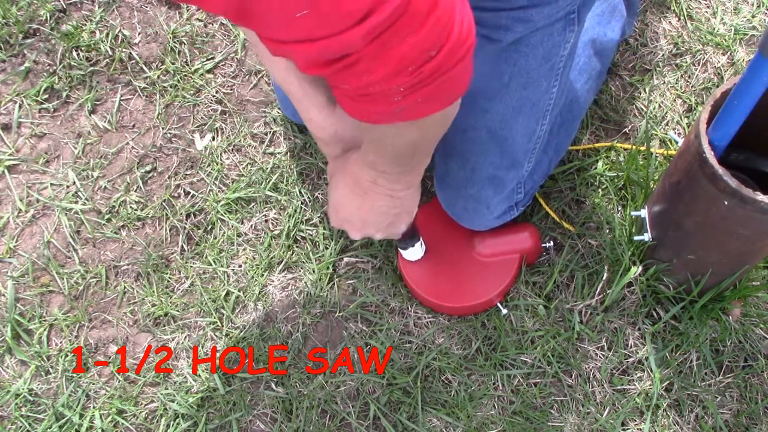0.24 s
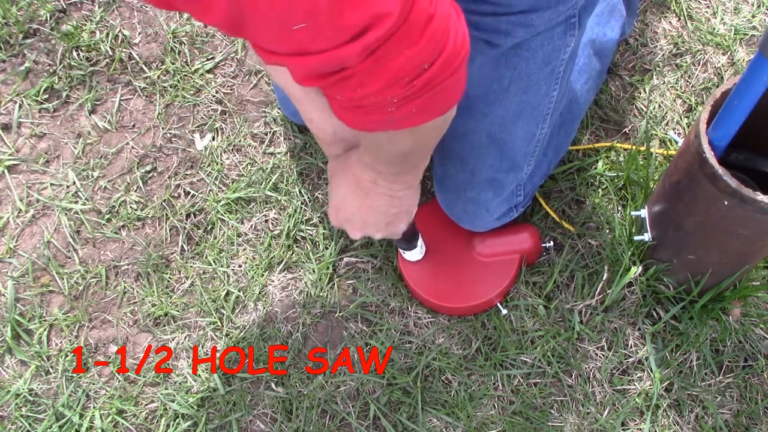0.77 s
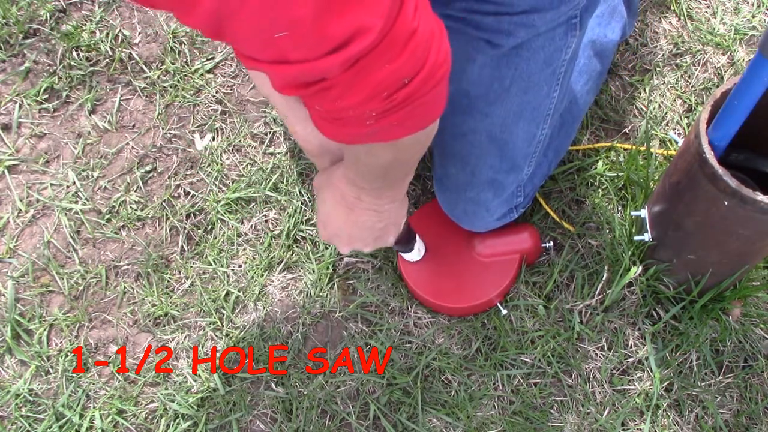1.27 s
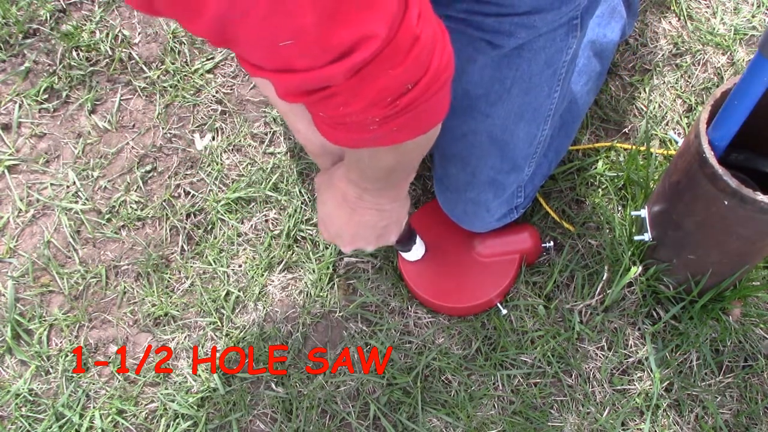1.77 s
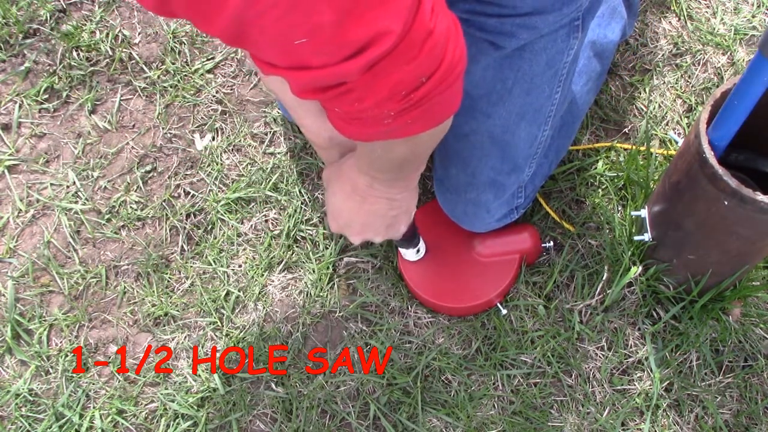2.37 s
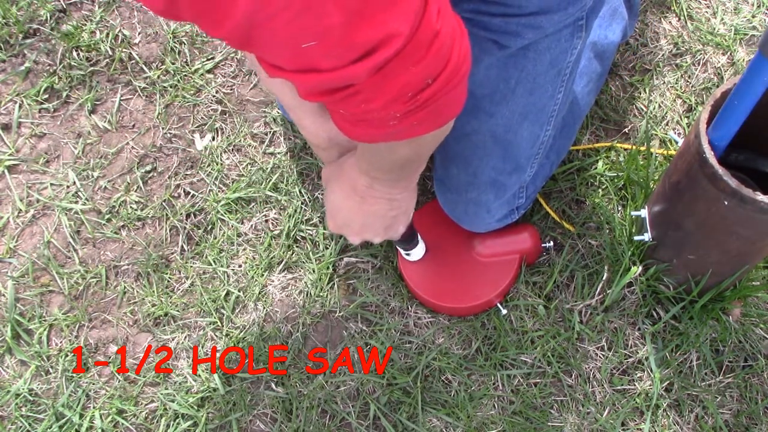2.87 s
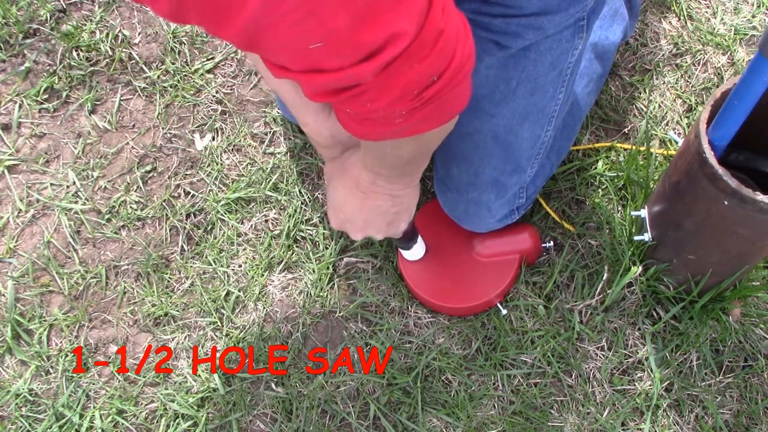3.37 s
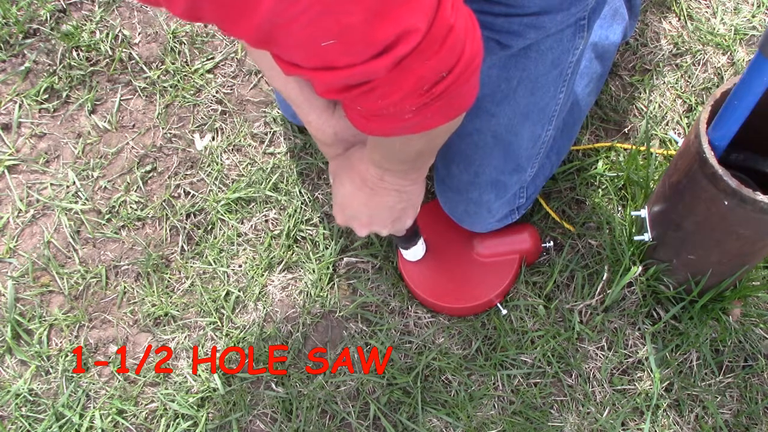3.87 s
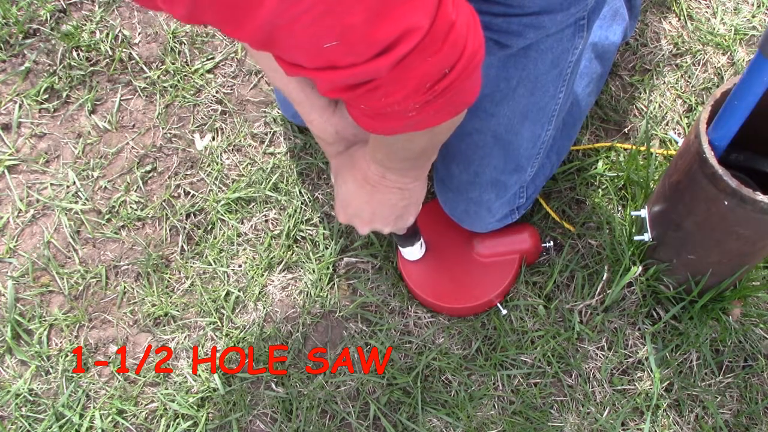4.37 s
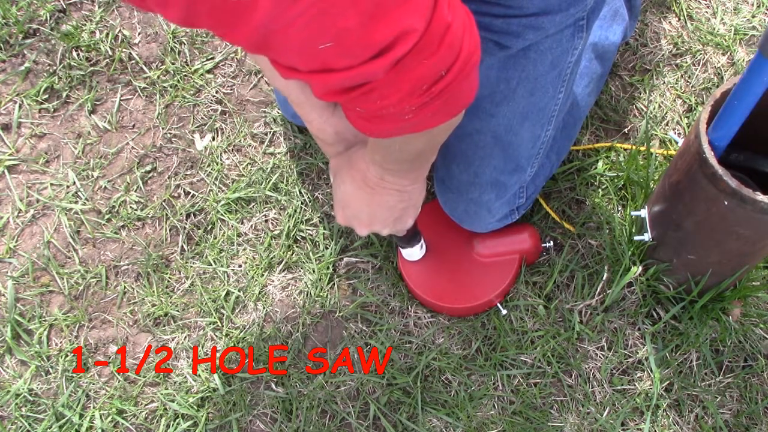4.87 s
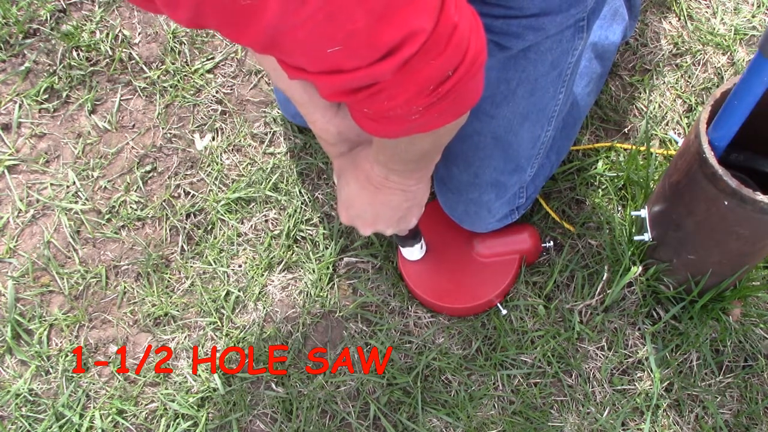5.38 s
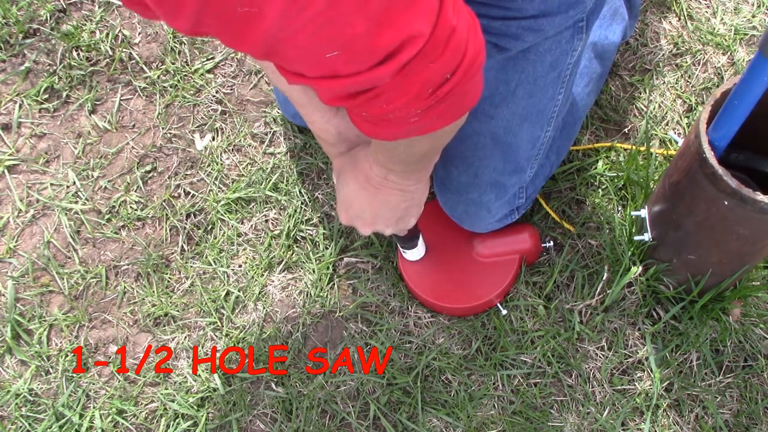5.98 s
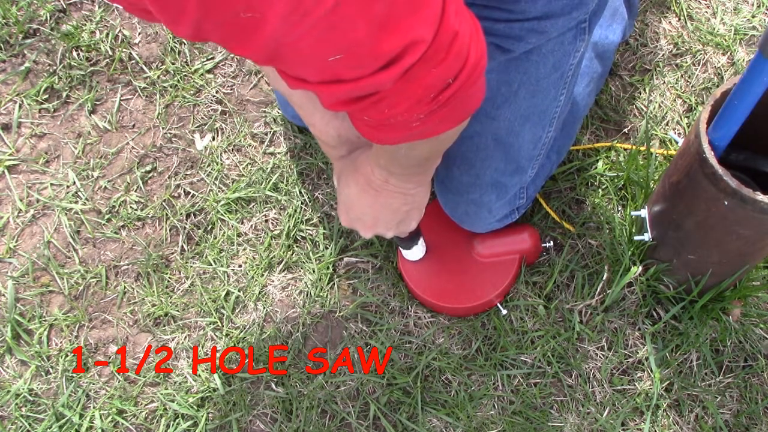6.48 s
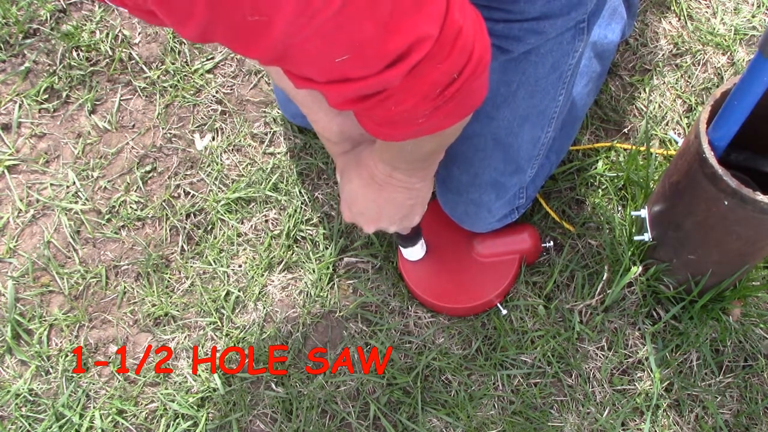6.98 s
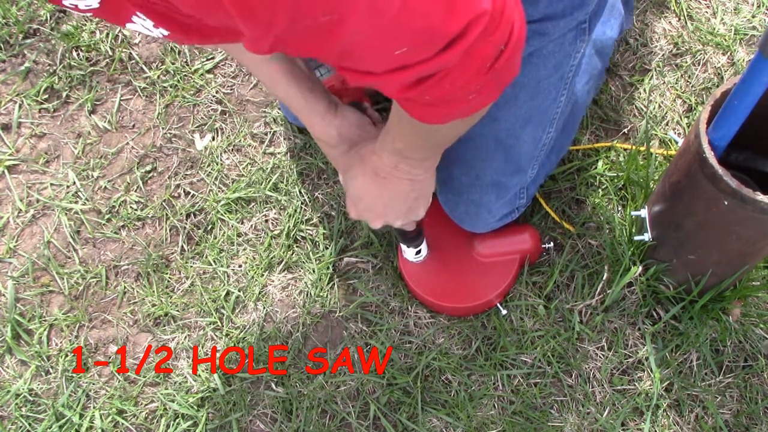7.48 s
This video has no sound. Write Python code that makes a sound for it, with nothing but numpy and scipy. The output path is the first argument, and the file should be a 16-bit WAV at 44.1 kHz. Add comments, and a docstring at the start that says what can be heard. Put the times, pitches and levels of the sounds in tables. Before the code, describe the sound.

Quiet lawn air with a faint low rumble, then a bright metallic knock as a hole saw meets an iron lid. The cordless drill stutters and nearly stalls, then climbs in steps to a steady buzzing whine over gritty scraping. Late on it slips free, races up and squeaks, stops briefly, bursts again and jams with clunks. Close, dry outdoor pickup.

```python
"""Hole saw in a cast-iron lid

A cordless drill cuts into a lid on a lawn: rumble and air behind, motor and saw in front.
Motor: sines on multiples of the turning field, plus switching whistles whose sidebands spread with speed.
Saw: noise chips through resonances of lid, teeth and cup; short grabs, knocks, squeaks and a ground jolt.
The speed moves in steps; the saw slips free twice, jams and stops."""
import sys
import numpy as np
from scipy import signal
from scipy.fft import rfft, irfft
from scipy.io import wavfile
from scipy.ndimage import uniform_filter1d

SR = 44100
rng = np.random.default_rng(int(sys.argv[2]) if len(sys.argv) > 2 else 0)


def materialize(psi):
    """Save the field psi as 16-bit PCM at rate SR to the path in sys.argv[1].

    A 1-D psi becomes a single channel; in a 2-D psi each row is a channel.
    """
    bounded = np.clip(np.atleast_2d(psi).T, -1, 1)
    quanta = np.round(bounded * 32767).astype(np.int16)
    wavfile.write(sys.argv[1], SR, quanta)


N = 341334

# lawn noise spectrum: [f/Hz, relative level/dB]
LAWN_SPECTRUM = [(15, -40), (25, -22), (48, -12), (61, -5.5), (156, -5), (178, -9), (331, -21), (598, -14),
                 (1710, -25), (4500, -37.5), (12500, -43), (13900, -45), (15500, -40)]
LAWN_RMS_DB = -44

# trigger and hand moves: [t/s, field speed headed for/Hz, lag/s, drive/dB, switching/dB, tooth bite/dB]
TRIGGER_MOVES = [(.449, 212.5, 0.025, -0.5, -37.5, -1), (.606, 132, 0.028, 2.5, -39.5, -3),
                 (0.9001, 379.5, 0.032, -1, -35.5, 2.5), (1.0863, -112, 0.07, -4.5, -42.5, -1),
                 (1.2966, 160.5, .025, -6, -37.5, -0.5), (1.4197, 385, 0.019, 0.5, -38.5, 0.5),
                 (2.02, 707, 0.069, 1, -33.5, -0.5), (2.1068, 540, 0.06, -1.5, -34, -2),
                 (2.3, 528, 0.27, -1, -34.5, -1.5), (3.4118, 718, 0.056, -1.5, -33, 1),
                 (3.56, 688, 0.051, 1.1, -37, 2), (3.8, 678, .25, 0, -36, -1.5),
                 (4.19, 673.5, .25, -1.1, -37, -0.5), (6.11, 720, .035, 1.5, -38, 0),
                 (6.175, 1850, 0.051, 2, -49, 1.5), (6.258, 1329.5, 0.038, -2.5, -47, -1),
                 (6.325, 850, 0.033, -8.5, -47, -2), (6.403, 342.5, .012, 4.5, -50, -2),
                 (6.424, 340, 0.016, -24, -42, -10), (6.4874, 585.5, 0.039, 0.5, -37.5, 0.5),
                 (6.812, 1420, 0.022, 2, -46, 0.5), (6.935, 1158, .022, -1.5, -48, 0.5),
                 (7.08, 1100, 0.063, 0.5, -50.5, 1.5)]
INITIAL_FIELD_HZ, MIN_FIELD_HZ = 197, 5
LEVEL_SMOOTHING_S = .015
# short level dips: [t/s, motor depth/dB, saw depth/dB, Gaussian half-width at 1/e/s]
LEVEL_DIPS = [(4.18, -14, -5, .005), (5.14, -8, 0, .006), (6.185, -16, -8, .004), (7.078, -14, -10, .005)]

MOTOR_ON_S, MOTOR_OFF_S = 0.4565, 7.2
# trigger let go between the cuts: (start t/s, end t/s)
TRIGGER_PAUSE_S = (6.45, 6.527)
POLE_PAIRS = 7
# strong multiples of the field speed
FIELD_MULTIPLES = (1, 2, 3, 4, 5, 7)
# their levels, swelling at housing resonances: [field speed/Hz, one level/dB per strong multiple]
FIELD_LEVELS = [(134, -60, -65, -46.5, -64, -66, -56), (174, -63, -66, -66, -62, -51, -38),
                (215, -62, -66, -49, -41, -32, -44), (289, -52, -58, -39, -49, -33, -51),
                (362.6, -43, -64, -28.5, -50, -52, -27), (388, -59, -42.5, -34.5, -55, -42, -29),
                (482, -36, -29, -36, -53, -38, -28), (527.4, -42, -23, -35, -32, -34, -32),
                (586, -48, -20.5, -31.5, -26.5, -18.5, -39), (600, -40, -20.5, -27, -20, -15, -40),
                (643.2, -30, -23.5, -36, -7.5, -17, -31), (680.3, -40, -28.5, -41, -9, -27, -50),
                (704, -34, -41, -46, -7.5, -42, -50), (785.4, -24.5, -45, -34, -12.5, -37, -45),
                (920, -21.5, -48, -14, -24, -43, -47), (1100, -14.5, -38, -40, -23, -46, -48),
                (1145.6, -17.5, -39, -39, -21.5, -40, -53), (1230, -21, -42, -42, -21.5, -32, -56),
                (1285.5, -25, -40, -43, -23, -40, -55), (1345, -36, -32, -46, -49, -41, -56)]
# weaker lines, unbalance, gear mesh, high multiples: [multiple of shaft speed, level/dB, waver/dB]
SHAFT_LINES = [(3, -1, 2), (4, 4, 2), (5, 2, 2), (6, 4, 2), (12.24, -10, 4), (13.56, -6, 2), (19.35, -4, 4),
               (20.07, -3, 4), (21.52, 0, 3), (22.76, -6, 2), (31.7, -7, 3), (42, -6, 2), (56, -1.5, 4)]
SHAFT_LINES_DB, SHAFT_FULL_FIELD_HZ = -38, 480
# housing radiation of the weaker lines: [f/Hz, gain/dB]
HOUSING_GAIN = [(300, -10), (600, -8), (720, -2.5), (900, -12.5), (1150, 8), (1600, 1.5), (2200, 6.5),
                (2800, -2), (3200, 15.5), (3600, -1), (4100, -8), (5500, -13), (8000, -4), (11000, -30)]
SIXTH_FROM_HZ, SIXTH_FADE_HZ, SIXTH_DB = 1190, 90, -28.5
SWITCH_HZ = 7806
# switching whistles: [multiple of switching rate, multiple of field added, level/dB]
SWITCH_SIDEBANDS = [(1, 0, -7.5), (1, -1, 3), (1, 1, -2), (1, -2, -17), (1, 2, -10), (2, -1, -24),
                    (2, -2, -22)]
# housing radiation of the whistles: [f/Hz, gain/dB]
WHISTLE_GAIN = [(6400, -4), (7000, 8.5), (7130, 2), (7270, -10.5), (7420, -0.5), (7600, -0.5), (8000, -9.5),
                (8190, -0.5), (8340, 5), (8480, -2), (8900, 0), (9200, -24), (14300, -1), (15500, 4)]

STRIKE_S, LIFT_S, CUT_END_S = .479, 6.432, 7.2  # cup hits the iron, teeth leave it, last cut ends
JAM_S, JAM_FADE_S = 7.21, 0.0089  # saw tight in the hole: cup damped, lid dragged
# steady cut against speed: [field speed/Hz, scrape/dB, then below scrape: lid/dB, hiss/dB, top/dB]
CUT_LEVELS = [(8.03, -46, -2, -7.5, -24), (75, -38.5, 2, -8, -35), (131, -31.5, -0.5, -10, -23.5),
              (212, -29, -4, -9.5, -25), (384, -24.5, -4.5, -8, -22), (495, -21.5, -3, -5, -21),
              (704, -20, -5.5, -6, -19), (900, -19.5, -5.5, -4.5, -18.5), (1140, -16.5, -2.5, -3.5, -16),
              (1370, -15.5, -1, -3.5, -16)]
# grabs of the teeth: [t/s, scrape/dB, attack/s, hold/s, t60/s, below scrape: lid/dB, hiss/dB]
TOOTH_GRABS = [(0.46, -24.5, .001, 0.016, .08, -16, -20), (.478, -22, 0.0025, 0.0033, 0.028, -13, -5),
               (1.318, -28, 0.0036, .012, 0.2, -8.5, -17), (1.425, -23.5, 0.013, 0.01, 0.23, -10, -14),
               (6.187, -15, .005, .008, 0.097, -16, -14), (6.405, -18.5, .006, .018, 0.069, -2.5, -7.5),
               (6.432, -33, 0.0031, 0.0097, 0.14, -3, -9), (6.524, -12.5, 0.0011, 0.025, .2, -20, -17),
               (6.82, -15, 0.0063, .01, .12, -14, -18), (7.18, -13.5, .01, 0.026, 0.17, 1, -6),
               (7.222, -12, 0.0039, 0.011, 0.087, -1.5, -11.5),
               (7.27, -37.5, 0.0061, 0.034, 0.16, 4.5, -12), (7.345, -33, .003, .01, .05, 0, -11),
               (7.353, -13.5, 0.017, 0.037, .035, 0.5, -15), (7.41, -36, 0.0055, 0.014, .28, 4, -8.5)]
GRAB_TOP_BELOW_HISS_DB = -11
# lid rumble resonances: [f/Hz, width/Hz, level/dB]
LID_MODES = [(337, 168, 1), (474.6, 92, -1.5), (684, 346, 1.5), (1097, 136, -2.5), (1240, 172, 6),
             (1654, 610, 0.5), (1955, 533, 8.5)]
# scrape resonances while the saw turns freely in its cut: [f/Hz, width/Hz, level/dB]
TEETH_MODES = [(2663, 1220, -4.5), (3012, 458, 1), (3256, 146, -5), (3560, 570, -4.5)]
# scrape resonances of the dragged lid after the jam: [f/Hz, width/Hz, level/dB]
DRAG_MODES = [(2244, 110, -1), (2540, 205, 1), (2800, 600, 0), (3590, 480, -2)]
# hiss resonances: [f/Hz, width/Hz, level/dB]
HISS_MODES = [(4365, 720, -0.5), (5510, 1400, -2.5), (6270, 1040, 0.5), (7830, 1250, -5.5)]
# top resonances: [f/Hz, width/Hz, level/dB]
TOP_MODES = [(9020, 530, 0.5), (10450, 1600, 8), (10940, 800, 8), (12560, 900, 7.5)]
# cancelling lid modes: [f/Hz, width/Hz, share taken out/0-1]
LID_NODES = [(4050, 260, 0.35)]
# saw-cup modes: [f/Hz, level re scrape drive/dB, struck level/dB, t60/s]
CUP_MODES = [(2817, -9.5, -4, .35), (10720, -34, -13, .1), (12400, -44, -26, .07), (11700, -44, -30, .1),
             (5900, -44, -20, .02), (4250, -44, -22, .02)]

# knocks on the iron: [t/s, crack gain/dB, thud f/Hz, thud level/dB, crack t60/s]
IRON_KNOCKS = [(0.461, -22, 527, -38, 0.024), (0.467, -24, 437, -28, 0.028), (0.478, 7.5, 453, -25, 0.019),
               (1.319, -28, 353, -46, 0.03), (6.407, -6, 834, -10.5, 0.03), (6.42, -12, 475, -37, 0.021),
               (6.526, 2.5, 388, -38, 0.024), (7.204, 2, 342, -4, 0.045), (7.227, 5.5, 390, -11, 0.026),
               (7.306, -10.5, 1130, -22, 0.03), (7.365, -1, 417, -16, 0.019), (7.449, -20, 417, -44, 0.03),
               (7.497, -28, 330, -25, 0.02), (7.56, -29, 271, -26.5, 0.019),
               (7.689, -29, 492, -55.5, 0.051)]
CRACK_RMS, THUD_T60_RATIO = 0.16, 1.74  # noise rms at 0 dB crack gain; thud t60 re crack t60
# squeaks of the free cup: [t/s, level/dB, f/Hz, t60/s]
CUP_SQUEAKS = [(6.2492, -17, 13100, 0.05), (6.2891, -5.5, 13200, 0.036), (6.3245, -16, 13100, 0.06),
               (6.3674, -15, 13200, 0.05), (6.8768, -10, 13100, 0.05), (6.9047, -9.5, 13190, 0.055),
               (6.9448, -15, 13100, 0.053)]
# ground shaking: [t/s, level/dB]
GROUND_JOLT = [(7.17, -70), (7.21, -32), (7.27, -36), (7.33, -34), (7.43, -42), (7.5, -70)]

LOWPASS_HZ = 15600


def undb(db):
    """Gain of a level in dB."""
    return 10 ** (np.asarray(db) / 20)


def unit(x):
    """Scale to rms 1."""
    return x / np.sqrt(np.mean(x ** 2))


def decay(t, t60):
    """Exponential decay, 60 dB in t60."""
    return np.exp(-np.log(1000) * t / t60)


def response(table, hz):
    """Gain at hz, interpolated in dB over log frequency."""
    f, db = np.transpose(table)
    return undb(np.interp(np.log(hz + 1), np.log(f), db))


def by_speed(table, hz):
    """Table columns interpolated at field speed hz."""
    speed, *columns = np.transpose(table)
    return [np.interp(hz, speed, column) for column in columns]


def band(x, hz, width):
    """One resonance, gain 1 at the centre."""
    return signal.lfilter(*signal.iirpeak(hz, hz / width, SR), x)


def body(x, modes):
    """Parallel two-stage resonances of alternating sign, rms 1 in total."""
    out = 0
    for k, (f, width, db) in enumerate(modes):
        mode = unit(band(band(x, f, width), f, 2 * width))
        out = out + (-1) ** k * undb(db) * mode
    return unit(out)


def walk(rate_hz):
    """Random levels held 1 / rate_hz and slewed twice, rms 1."""
    k = int(SR / rate_hz)
    held = np.repeat(rng.standard_normal(N // k + 1), k)
    return unit(uniform_filter1d(uniform_filter1d(held, k), k)[:N])


def add(out, s, x):
    """Mix x into out from time s."""
    i = int(s * SR)
    out[i:i + len(x)] += x[:N - i]


def ring(hz, t60, attack_s=0.00058):
    """A mode set ringing: decaying sine with a soft onset."""
    t = np.arange(SR // 2) / SR
    return np.sin(2 * np.pi * hz * t) * decay(t, t60) * (1 - np.exp(-t / attack_s))


def lawn():
    """Distant rumble and air: shaped noise, wavering a little."""
    spectrum = rfft(rng.standard_normal(N)) * response(LAWN_SPECTRUM, np.fft.rfftfreq(N, 1 / SR))
    return undb(LAWN_RMS_DB + 0.26 * walk(4.4)) * unit(irfft(spectrum, N))


def ground_jolt():
    """Ground shaking: noise through two low resonances under a level curve."""
    level_db = np.interp(np.arange(N) / SR, *np.transpose(GROUND_JOLT))
    return undb(level_db) * body(rng.standard_normal(N), [(75, 44, -0.15), (150, 67, -1.9)])


def knocks():
    """Saw on iron: a decaying noise crack and a thud of the lid on the turf."""
    out, t = np.zeros(N), np.arange(SR // 2) / SR
    for s, crack_db, thud_hz, thud_db, t60 in IRON_KNOCKS:
        noise = unit(band(rng.standard_normal(SR // 2), 3000, 2200))
        crack = CRACK_RMS * noise * decay(t, t60)
        thud = ring(thud_hz, THUD_T60_RATIO * t60, 0.00012)
        add(out, s, undb(crack_db) * crack + undb(thud_db) * thud)
    return out


def struck_cup():
    """The cup hits the iron: all its modes ring at once."""
    out = np.zeros(N)
    for hz, _, struck_db, t60 in CUP_MODES:
        add(out, STRIKE_S, undb(struck_db) * ring(hz, t60))
    return out


def squeaks():
    """Rim squeaks as the cup spins free: short decaying sines."""
    out = np.zeros(N)
    for s, db, hz, t60 in CUP_SQUEAKS:
        add(out, s, undb(db) * ring(hz, t60, 0.0017))
    return out


def trigger():
    """Speed follows each move like a damped mass; drive, switching and bite hold until the next move."""
    t = np.arange(N) / SR
    hz, last_hz = INITIAL_FIELD_HZ, INITIAL_FIELD_HZ
    for s, goal_hz, lag_s, *_ in TRIGGER_MOVES:
        u = np.maximum(t - s, 0) / lag_s
        hz = hz + (goal_hz - last_hz) * (1 - (1 + u) * np.exp(-u))  # critically damped step
        last_hz = goal_hz
    moves = np.transpose(TRIGGER_MOVES)
    current = np.maximum(np.searchsorted(moves[0], t) - 1, 0)
    levels_db = uniform_filter1d(moves[3:, current], size=int(LEVEL_SMOOTHING_S * SR), axis=1)
    return [np.maximum(hz, MIN_FIELD_HZ), *levels_db]


def grab_power():
    """Power of scrape, lid, hiss and top as the teeth grab: attack, hold, release."""
    t, power = np.arange(N) / SR, 0
    for s, scrape_db, attack_s, hold_s, t60, lid_db, hiss_db in TOOTH_GRABS:
        attack = np.clip((t - s) / attack_s, 0, 1)
        release = decay(np.maximum(t - s - attack_s - hold_s, 0), t60)
        below_db = np.array([[0], [lid_db], [hiss_db], [hiss_db + GRAB_TOP_BELOW_HISS_DB]])
        power = power + (attack * release * undb(scrape_db + below_db)) ** 2
    return power


def cut_gains(hz, bite_db):
    """Gains of scrape, lid, hiss and top: steady cut and grabs summed in power."""
    t = np.arange(N) / SR
    first_cut = (t > STRIKE_S) & (t < LIFT_S)
    second_cut = (t > TRIGGER_PAUSE_S[1] + .006) & (t < CUT_END_S)
    gate = uniform_filter1d(1. * (first_cut | second_cut), size=400)
    scrape_db, *below_db = by_speed(CUT_LEVELS, hz)
    steady = gate * undb(scrape_db + bite_db + np.array([0 * t, *below_db]))
    return np.sqrt(steady ** 2 + grab_power())


def scraped_cup(push, chips):
    """Scraping drives the cup's narrow modes, which ring on after the drive."""
    out = 0
    for hz, db, _, t60 in CUP_MODES:
        width = np.log(1000) / np.pi / t60
        out = out + undb(db) * band(push * chips, hz, width) / np.std(band(chips, hz, width))
    return out


def saw(hz, bite_db):
    """Dense chips of uneven size drive lid, teeth and cup; the jam damps the cup and drags the lid."""
    t = np.arange(N) / SR
    push, lid_gain, hiss_gain, top_gain = cut_gains(hz, bite_db)
    chip_db = 1.9 * rng.exponential(size=N) + 0.5 * walk(150) + 0.86 * walk(9)
    chips = rng.standard_normal(N) * undb(chip_db)
    free = np.clip((JAM_S - t) / JAM_FADE_S, 0, 1)
    teeth = free * body(chips, TEETH_MODES) + (1 - free) * body(chips, DRAG_MODES)
    lid = body(chips, LID_MODES)
    hiss = body(chips, HISS_MODES)
    top = signal.sosfilt(signal.butter(10, 13700, fs=SR, output="sos"), body(chips, TOP_MODES))
    scrape = push * teeth + lid_gain * lid + hiss_gain * hiss + top_gain * top
    for f, width, share in LID_NODES:
        scrape -= share * band(scrape, f, width)
    return scrape + free * scraped_cup(push, chips)


def field_tones(turn, hz, drive_db):
    """Magnetic force on the housing: sines on strong field multiples, level set by speed."""
    out = 0
    for k, db in zip(FIELD_MULTIPLES, by_speed(FIELD_LEVELS, hz)):
        gain = undb(drive_db + db + 0.93 * walk(70) + 0.94 * walk(8.6))
        out = out + gain * np.sin(k * turn + k)
    # the 6th multiple whistles thinly at the top of a free spin
    sixth_gain = undb(SIXTH_DB) * np.clip((hz - SIXTH_FROM_HZ) / SIXTH_FADE_HZ, 0, 1)
    return out + sixth_gain * np.sin(6 * turn)


def shaft_tones(turn, hz, drive_db):
    """Unbalance, gears and weak multiples: lines on the shaft speed, growing with its square."""
    out = 0
    spin = np.minimum(hz / SHAFT_FULL_FIELD_HZ, 1) ** 2
    for k, db, waver_db in SHAFT_LINES:
        gain = undb(SHAFT_LINES_DB + drive_db + db + waver_db * walk(50))
        gain = gain * response(HOUSING_GAIN, k * hz / POLE_PAIRS)
        out = out + gain * spin * np.sin(k * turn / POLE_PAIRS + k)
    return out


def switching_whistle(turn, hz, switch_db):
    """Switching-rate multiples with sidebands offset by the field speed."""
    t, out = np.arange(N) / SR, 0
    for m, k, db in SWITCH_SIDEBANDS:
        gain = undb(switch_db + db + 0.97 * walk(30)) * response(WHISTLE_GAIN, m * SWITCH_HZ + k * hz)
        out = out + gain * np.sin(2 * np.pi * m * SWITCH_HZ * t + k * turn)
    return out


def motor(hz, drive_db, switch_db):
    """Brushless motor: all tones share one field phase, its speed wandering slightly at random."""
    t = np.arange(N) / SR
    shaken_hz = hz + 0.899 * walk(8) + 1.542 * walk(20) + 1.239 * walk(90)
    turn = 2 * np.pi * np.cumsum(shaken_hz) / SR
    tones = field_tones(turn, hz, drive_db) + shaft_tones(turn, hz, drive_db)
    tones = tones + switching_whistle(turn, hz, switch_db)
    paused = (t > TRIGGER_PAUSE_S[0]) & (t < TRIGGER_PAUSE_S[1])
    released = (t < MOTOR_ON_S) | (t > MOTOR_OFF_S) | paused
    return np.sqrt(2) * tones * uniform_filter1d(1. - released, size=200)  # sqrt(2): levels are rms


def dip_gains():
    """Gains of motor and saw through the short level dips."""
    t = np.arange(N) / SR
    motor_dip_db, saw_dip_db = 0, 0
    for s, motor_db, saw_db, width_s in LEVEL_DIPS:
        dip = np.exp(-((t - s) / width_s) ** 2)
        motor_dip_db = motor_dip_db + dip * motor_db
        saw_dip_db = saw_dip_db + dip * saw_db
    return undb(motor_dip_db), undb(saw_dip_db)


def scene():
    """Drill, saw and knocks over the lawn."""
    background = lawn() + ground_jolt()
    impacts = knocks() + struck_cup() + squeaks()
    hz, drive_db, switch_db, bite_db = trigger()
    motor_gain, saw_gain = dip_gains()
    drill = saw(hz, bite_db) * saw_gain + motor(hz, drive_db, switch_db) * motor_gain
    return (background + impacts + drill)[None]


def record(dry):
    """The microphone rounds the loudest peaks and cuts the top."""
    rounded = np.tanh(.7 * dry) / .7
    return signal.sosfilt(signal.ellip(10, .2, 100, LOWPASS_HZ, fs=SR, output="sos"), rounded)


dry = scene()
out = record(dry)
materialize(out)
```